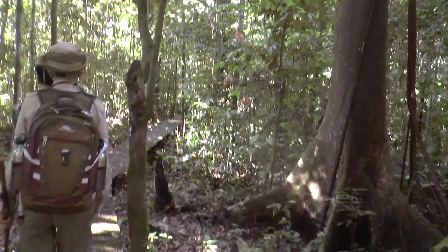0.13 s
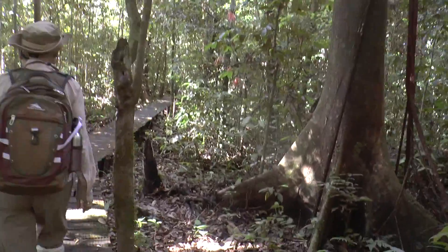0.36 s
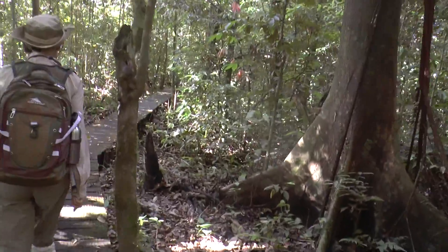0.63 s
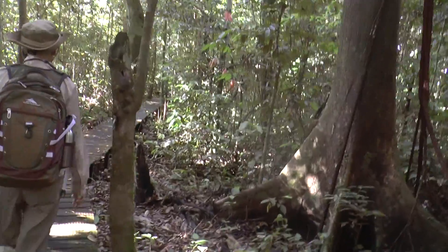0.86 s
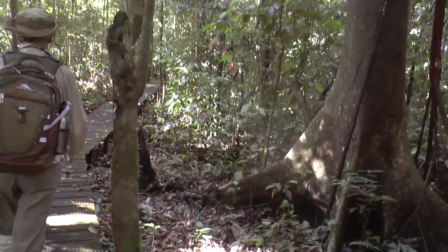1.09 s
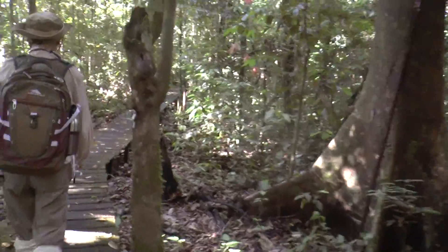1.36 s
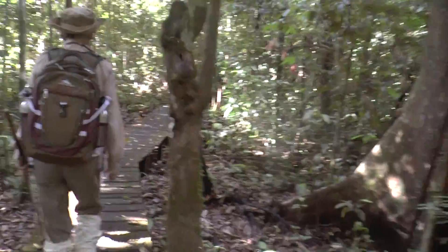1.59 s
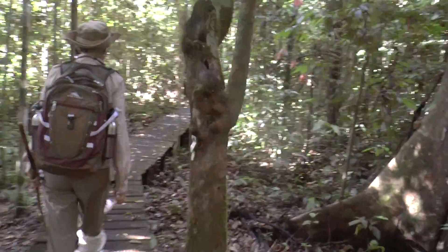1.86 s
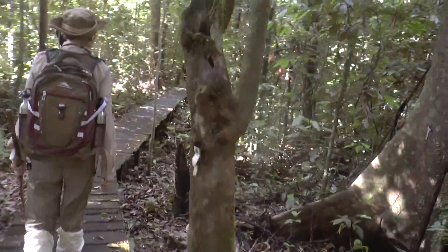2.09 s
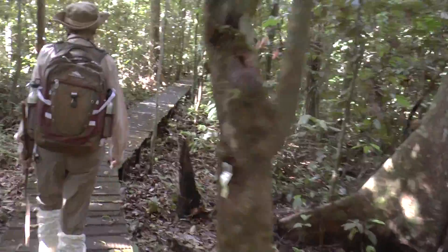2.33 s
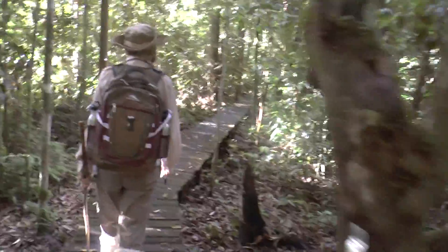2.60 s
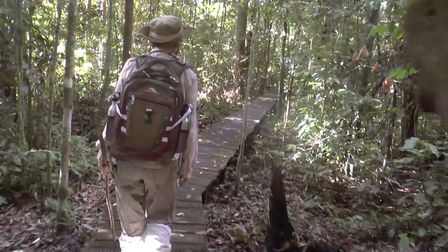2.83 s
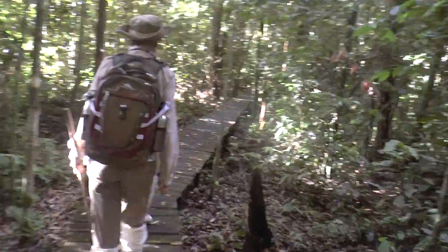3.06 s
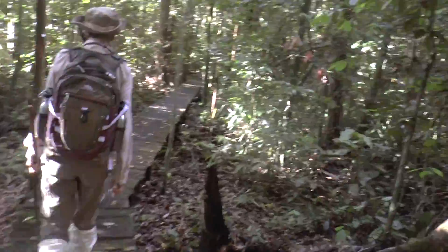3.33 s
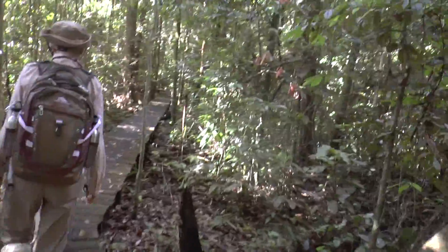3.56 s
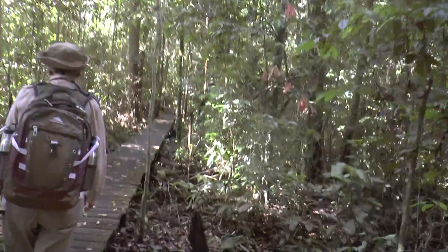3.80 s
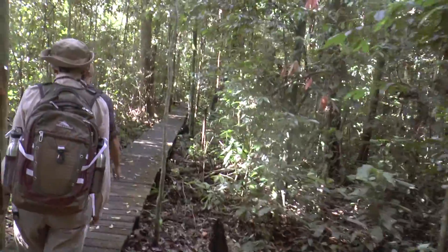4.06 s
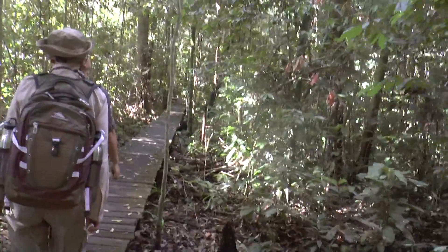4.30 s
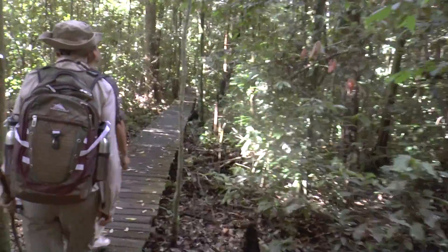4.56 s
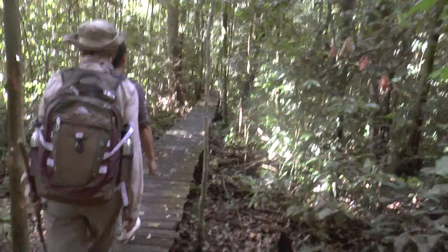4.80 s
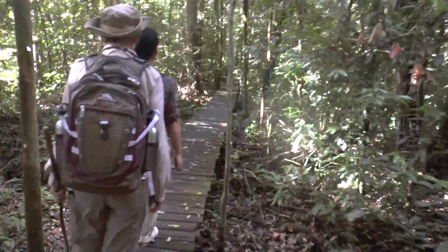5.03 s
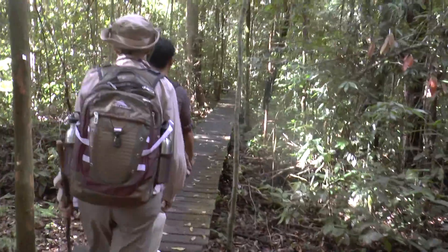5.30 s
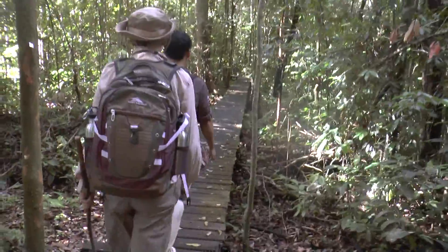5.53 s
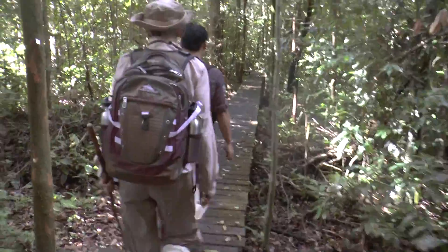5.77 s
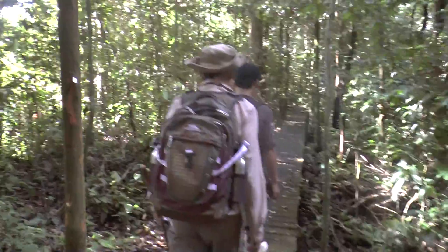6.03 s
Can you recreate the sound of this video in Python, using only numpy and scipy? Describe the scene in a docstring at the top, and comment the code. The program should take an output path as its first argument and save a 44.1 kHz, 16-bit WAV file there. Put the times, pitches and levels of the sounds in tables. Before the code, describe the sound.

Outdoors in dense rainforest, heard through two close microphones on a moving camera: high insect hiss, soft leaf rustle and a shrill pulsating cicada. Footsteps thud and knock on boards, some with sharp hard clicks, clothes swishing. A thin bird whistle precedes the cicada's first coarse rasp near two seconds; a clean buzz leads back into the throb. Small ticks and hollow board thumps follow, then a second rasp and restart.

```python
"""In a rain forest a far chorus hisses and leaves rustle as noise bands, while a near cicada throbs as ringing clicks.
Boots knock on a plank walkway by pushing noise through resonances; hard dry knocks ring and cloth swishes as noise.
The throb turns slower, a bird whistles a run of gliding tones, and the song breaks into a broad rasp of clicks.
A clean buzz leads into the next phrase; a small insect ticks, a loose board hums twice, then the rasp returns
and the song starts again. A hand-held camera hears it all through two close microphones."""
import sys
import numpy as np
from scipy import signal
from scipy.fft import rfft, irfft, next_fast_len
from scipy.io import wavfile
from scipy.ndimage import uniform_filter1d, map_coordinates

SR = 44100
rng = np.random.default_rng(int(sys.argv[2]) if len(sys.argv) > 2 else 0)


def volts_from_db(level):
    """Convert decibel levels to linear amplitude ratios."""
    exponent = np.asarray(level, float) / 20
    return 10 ** exponent


def persist_wave(psi):
    """Save psi, clipped to +-1, as 16-bit WAV."""
    counts = np.round(np.clip(psi, -1, 1) * 32767).astype(np.int16)
    wavfile.write(sys.argv[1], SR, np.atleast_2d(counts).T)


N = 271215


def unit(x):
    """Scaled to rms 1."""
    return x / np.sqrt(np.mean(x ** 2) + 1e-20)


def along(points, hz):
    """(f/Hz, value) points read on a log frequency axis."""
    f, v = np.transpose(points)
    return np.interp(np.log(hz + 1), np.log(f + 1), v)


def curves(rows, outside=None):
    """One value per sample for each column after the time."""
    s, *cols = np.transpose(rows)
    return [np.interp(np.arange(N) / SR, s, c, outside, outside) for c in cols]


def wobble(rate):
    """A smooth random curve, rate knots a second."""
    return map_coordinates(rng.standard_normal(N // 50), [np.arange(N) * rate / SR])


def filtered(x, response):
    """x times a complex response of frequency."""
    m = next_fast_len(N + 8192)
    return irfft(rfft(x, m) * response(np.fft.rfftfreq(m, 1 / SR)), m)[..., :N]


def coloured(x, spectrum):
    """x shaped by (f/Hz, level/dB) points, rms 1."""
    return unit(filtered(x, lambda hz: volts_from_db(along(spectrum, hz))))


def modes(table):
    """Causal response of resonances (f/Hz, width/Hz, level/dB), alternating in sign."""
    def response(f):
        total = 0
        for k, (centre, width, db) in enumerate(table):
            damping = 1j * f * width
            total = total + (-1) ** k * volts_from_db(db) * damping / (centre * centre - f * f + damping)
        return total
    return response


def patchy(depth_db):
    """Noise whose gain drifts in patches of time and frequency."""
    z = signal.stft(rng.standard_normal(N + 512), nperseg=512)[2]
    field = uniform_filter1d(rng.standard_normal(z.shape), size=6, axis=0)
    field = uniform_filter1d(field, size=12, axis=1)
    return signal.istft(z * volts_from_db(depth_db * unit(field)), nperseg=512)[1][:N]


def crackle(spread_db):
    """Noise of very unequal strength from moment to moment, as from grit or cloth."""
    return unit(rng.standard_normal(N) * volts_from_db(spread_db * wobble(700)))


# scatter among the trees around the camera: f/Hz, t60/s
TRUNK_DECAY = [(150, 0.98), (1000, 0.43), (4000, 0.36), (12000, 0.052)]


def echo(x, wet_db):
    """x plus its scatter off trunks and leaves, a decaying noise that changes as the camera moves on."""
    out, hop = np.pad(x, (0, SR)), SR // 4
    for start in range(0, N, hop):
        hz, t, z = signal.stft(rng.standard_normal(SR // 2), SR, nperseg=256)
        decay = volts_from_db(-60 * t / along(TRUNK_DECAY, hz)[:, None])
        tail = signal.istft(z * decay, SR, nperseg=256)[1]
        wet = signal.fftconvolve(x[start:start + hop], tail / np.linalg.norm(tail))
        out[start:start + len(wet)] += volts_from_db(wet_db) * wet
    return out[:N]


def aside(x, side_db):
    """Two close ports hear a near source alike in the bass, less so higher up."""
    hz, t, z = signal.stft(x, SR, nperseg=256)
    turn = np.exp(2j * np.pi * rng.random(z.shape)) * (hz / (hz + 600))[:, None]
    side = volts_from_db(side_db) * signal.istft(z * turn, SR, nperseg=256)[1][:N]
    return np.array([x + side, x - side])


# far insects and leaves grow and sink together: t/s, chorus level/dB
STIR = [(0, -38), (.9, -41.5), (2.5, -39), (3.3, -41.5), (3.8, -38.5), (5.1, -41), (6.15, -37.5)]
# colours of the far insects, the leaves and the walkway's low rumble: f/Hz, level/dB per Hz
CHORUS_COLOUR = [(900, -21.5), (1600, -15.5), (2700, -6.5), (3300, 3.5), (5100, -1), (6200, -3.5),
                 (7300, -1), (8600, -7.5), (10100, -16), (12200, -19), (16300, -42)]
RUSTLE_COLOUR = [(60, -24), (100, -3.5), (440, -1.5), (760, -3), (1500, -11), (2600, -8.5), (3400, -49)]
RUMBLE_COLOUR = [(15, -30), (55, -23), (72, 17), (100, -2), (140, -34)]
# the rumble swells: t/s, level/dB
RUMBLE_SWELLS = [(3.8, -65), (4.8, -71)]
# the forest's difference between the two ports: f/Hz, level/dB per Hz
AROUND_COLOUR = [(20, -27), (350, -9.5), (2760, -20), (3700, -2.5), (5300, -11), (6600, -26), (8600, -13.5),
                 (10000, -45)]


def forest():
    """Far insects merge into hiss; leaves rustle, the walkway rumbles, and the ports differ a little."""
    rustle_offset_db, rustle_swing = -11, 0.94  # against the chorus mean and its rise and fall
    rumble_db, swell_s = -71, 0.35  # walkway at rest; width of a swell
    chorus_db, = curves(STIR)
    mean_db = chorus_db.mean()
    rustle_db = mean_db + rustle_offset_db + rustle_swing * (chorus_db - mean_db)
    t = np.arange(N) / SR
    sway = volts_from_db(rumble_db) + sum(volts_from_db(db) * np.exp(-((t - s) / swell_s) ** 2) for s, db in RUMBLE_SWELLS)
    chorus = volts_from_db(chorus_db + 0.67 * wobble(12)) * coloured(patchy(depth_db=1.4), CHORUS_COLOUR)
    rustle = volts_from_db(rustle_db + 0.35 * wobble(12)) * coloured(patchy(depth_db=1.6), RUSTLE_COLOUR)
    rumble = sway * coloured(rng.standard_normal(N), RUMBLE_COLOUR)
    around = volts_from_db(-49.5 + 0.29 * wobble(2.94)) * coloured(patchy(depth_db=2.0), AROUND_COLOUR)
    return chorus + rustle + rumble + np.array([around, -around])


# far whistled notes: start t/s, length/s, pitch f/Hz, rms level/dB at the note's end
NOTES = [(1.634, 0.089, 1870, -60), (1.79, 0.11, 1870, -55), (2.044, 0.13, 1987, -53),
         (2.233, 0.044, 1963, -46), (2.292, 0.066, 1998, -43), (2.381, 0.036, 1978, -41),
         (2.443, 0.055, 1965, -37.5)]


def bird():
    """A thin, far whistle in short notes, a sine gliding from pitch to pitch."""
    swell_db, release_s = 8, 0.025  # each note grows to its end, then stops
    t = np.arange(N) / SR
    s, length, hz, db = np.transpose(NOTES)
    u = (t - s[:, None]) / length[:, None]
    after = np.clip((u - 1) * length[:, None] / release_s, 0, 1)
    note_db = db[:, None] - swell_db * np.clip(1 - u, 0, 1)
    gain = np.sum((u > 0) * volts_from_db(note_db) * (1 - after), axis=0)
    onset_hz = (hz + np.append(hz[0], hz[:-1])) / 2  # halfway from the note before
    knots = np.ravel([s, s + length], 'F')
    pitch = np.interp(t, knots, np.ravel([onset_hz, hz], 'F')) + 5 * wobble(40.1)
    return np.sqrt(2) * uniform_filter1d(gain, size=500) * np.sin(2 * np.pi * np.cumsum(pitch) / SR)


# colour of a small, faint insect: f/Hz, level/dB per Hz
TICK_COLOUR = [(1500, -23), (1900, 3), (2950, 14), (3400, -29)]


def ticker():
    """Short, even ticks of decaying noise, slightly unequal in strength."""
    from_s, to_s, tick_hz, onset_db, t60_s = 3.447, 4.5, 20.8, -41, 0.055
    t = np.arange(N) / SR
    since = (t - from_s) % (1 / tick_hz)
    on = (t > from_s) & (t < to_s)
    gain = on * volts_from_db(onset_db + 2.5 * wobble(10) - 60 * since / t60_s)
    return gain * coloured(rng.standard_normal(N), TICK_COLOUR)


# the walkers' clothes brushing, before the mix: t/s, length/s, level/dB
SWISHES = [(0.665, 0.14, -40.5), (1.87, 0.096, -40.5), (1.91, 0.37, -39.5), (3.137, 0.035, -42),
           (4.158, 0.07, -33.5), (5.31, 0.37, -37.5)]
# colour of the cloth: f/Hz, level/dB per Hz
CLOTH_COLOUR = [(2000, -11), (5000, 4), (9000, -8), (13000, -17.5), (16400, -36)]


def clothes():
    """Cloth brushes cloth: a quick rise and a slower fade of uneven noise."""
    t = np.arange(N) / SR
    stroke = np.zeros(N)
    for s, length, db in SWISHES:
        u = np.clip((t - s) / length, 0, None)
        stroke += volts_from_db(db) * 4 * u * np.exp(1 - 4 * u)
    return stroke * coloured(crackle(spread_db=2.5), CLOTH_COLOUR)


# boot contacts on the boards, before the mix: t/s, knock level/dB, roll-on/s, plank t60/s,
# lightness level/dB (more grit, less thud)
STEPS = [(.17, -48.5, 0.033, 0.21, 1), (0.668, -42.5, .0092, 0.31, 1), (0.787, -45.5, 0.0044, 0.091, 4.5),
         (1.286, -41, 0.0083, 0.31, 2.5), (1.855, -35, 0.014, 0.27, 3), (2.566, -47, 0.015, 0.042, 1),
         (3.036, -39.5, 0.002, 0.4, 2), (3.587, -51.5, 0.039, 0.24, -0.5), (3.974, -47, 0.013, 0.23, 1),
         (4.137, -35.5, 0.037, 0.24, -0.5), (4.678, -36.5, 0.037, 0.17, -1.5),
         (5.262, -38.5, 0.011, 0.063, 1)]
# resonances of the plank, the beam below and the boot sole: f/Hz, width/Hz, level/dB
PLANK = [(407, 79, -3), (773, 120, -1.5), (1072, 154, 0.5), (1383, 150, -1)]
BEAM = [(104.4, 30, -4), (153, 120, -0.5), (275, 380, -3)]
SOLE = [(1840, 180, 1.5), (2120, 390, -0.5), (3170, 1300, -3.5)]


def steps():
    """The heel touches, the boot rolls on, rings plank and beam and grinds grit under its sole."""
    thud_db, grit_db = -2, 1  # relative to the knock
    force, t = np.zeros((3, N + SR)), np.arange(SR // 2) / SR  # rows: plank, beam, sole
    heel = np.array([[.45], [.1], [.55]])  # share of the force at first touch: the weight comes later
    lasting = np.array([[1.0], [1.25], [.6]])  # the beam rings longest, grit dies first
    for s, knock_db, roll, t60, light_db in STEPS:
        rise = np.clip(t / max(roll, .001), 0, 1)
        fade = volts_from_db(-60 * np.clip(t - roll, 0, None) / (max(t60, .01) * lasting))
        shape = (heel + (1 - heel) * rise) * fade
        balance = volts_from_db([[0], [thud_db - light_db], [grit_db + light_db]])
        force[:, round(s * SR):][:, :len(t)] += volts_from_db(knock_db) * balance * shape
    contact = crackle(spread_db=4.0)
    out = np.zeros(N)
    for push, body in zip(force[:, :N], (PLANK, BEAM, SOLE)):
        steep = lambda f: modes(body)(f) / (1 + 1j * f / (2 * body[-1][0]))  # rubber softens the top
        out += filtered(push * contact, steep) / np.std(filtered(contact, steep))
    return out


# a boot lands unevenly and raps the plank in quick clusters, before the mix:
# t/s, peak level/dB, contact pitch f/Hz
RAPS = [(0.682, -21, 2880), (0.717, -26.5, 2200), (1.308, -32, 950), (1.884, -22, 2100),
        (4.168, -26.5, 600), (4.181, -25, 1350), (4.298, -35.5, 684), (4.679, -34, 1300),
        (4.686, -31, 1280), (4.693, -27, 1330), (4.701, -34, 350), (4.712, -32, 298), (4.862, -36, 1280),
        (5.265, -29, 2000), (5.273, -35, 2200)]


def raps():
    """Each short contact favours the walkway's resonances near its own pitch."""
    out, t = np.zeros(N + SR), np.arange(2048) / SR
    ring = filtered(np.arange(N) == 0, modes(BEAM + PLANK + SOLE))[:len(t)]
    for s, db, hz in RAPS:
        contact = t * np.exp(-1.6 * hz * t) * np.sin(2 * np.pi * hz * t)
        rap = signal.fftconvolve(contact, ring)
        out[round(s * SR):][:len(rap)] += volts_from_db(db) * rap / np.abs(rap).max()
    return out[:N]


# a loose board hums briefly, before the mix: t/s, f/Hz, peak level/dB, length/s
THUMPS = [(3.683, 146, -39, .05), (3.975, 150, -44, .04)]


def loose_board():
    """Hollow thumps: low sines under half-sine swells."""
    s, hz, db, length = np.transpose(THUMPS)[..., None]
    u = np.clip((np.arange(N) / SR - s) / length, 0, 1)
    return np.sum(volts_from_db(db) * np.sin(np.pi * u) * np.sin(2 * np.pi * hz * length * u), axis=0)


# hard dry knocks on the boards, heel clicks with the louder steps and perhaps a stick, before the mix:
# t/s, peak level/dB
HARD_KNOCKS = [(0.669, -21), (1.538, -29), (1.669, -34), (1.866, -18.5), (3.041, -19.5), (3.35, -33.5),
               (3.867, -28.5), (5.351, -16)]
# resonances of the hard knock: f/Hz, width/Hz, level/dB
KNOCK_MODES = [(884, 180, 3.5), (1750, 150, -1.5), (2280, 170, -1), (3060, 210, 1)]


def hard_knocks():
    """Dry knocks: single blows ring a few resonances."""
    blows = np.zeros(N)
    for s, db in HARD_KNOCKS:
        blows[round(s * SR)] = volts_from_db(db)
    single = filtered(np.arange(N) == 0, modes(KNOCK_MODES))
    return filtered(blows, modes(KNOCK_MODES)) / np.abs(single).max()


CLICK_HZ = 264  # tymbal buckles a second in the song
RASP_S = .36  # from rasp to next phrase


def buckles(click_hz, clean, sharp, smear):
    """Each buckle of the ribbed membrane is a click with a short burst of noise; distance smears them."""
    turns = np.cumsum(click_hz * (1 + .015 * wobble(6) + .03 * wobble(120))) / SR
    clicks = np.diff(np.floor(turns), prepend=0)
    gate = np.exp(-sharp * (turns % 1))
    return clean * unit(clicks) + unit(rng.standard_normal(N) * gate) + smear * rng.standard_normal(N)


# phrases of the near song: throb slows t/s, rasp starts t/s, starting level/dB, slow throb depth level/dB,
# level/dB of the clean buzz after the rasp
PHRASES = [(1.117, 2.0, -32.5, 3, -26.5), (4.596, 5.437, -31.5, 7, -30), (8.042, 8.88, -30.5, 4, -30)]


def effort():
    """Gain of the song: each phrase sets in, tires, slows its throb and swells, then fades into the rasp."""
    fast_hz, slow_hz, fast_depth_db = 20.9, 16.2, 2.63  # throbs a second; depth of the fast throb
    turn_at_slowing, square = 0.4, 2.8  # throb phase in turns; each throb is a burst with steep sides
    sag_db_per_s, swell_db_per_s = 1.47, 4  # tiring from the start; growth added once slow
    rise_s, fade_s = 0.063, 0.065  # opening rise, fade into the rasp
    settle_s, deepen_s, blur_s = 0.067, 0.23, 0.35  # throb sets in, changes depth, blurs towards the rasp
    t, gain = np.arange(N) / SR, volts_from_db(-38)  # other singers under the rasp
    begin = -1.1  # the first phrase is under way
    for slows, rasps, level_db, depth_db, _ in PHRASES:
        age, late = np.clip(t - begin, 0, None), np.clip(t - slows, 0, None)
        opening = np.clip(age / rise_s, 0, 1) * np.clip((rasps - t) / fade_s, 0, 1)
        turns = turn_at_slowing + np.where(t < slows, fast_hz, slow_hz) * (t - slows)
        depth = np.interp(t, [begin, begin + settle_s, slows - deepen_s, slows, rasps - blur_s, rasps - fade_s],
                          [0, fast_depth_db, fast_depth_db, depth_db, depth_db, 0])
        throb = np.tanh(square * np.cos(2 * np.pi * turns))
        db = level_db - sag_db_per_s * age + swell_db_per_s * late + depth * throb
        gain = np.hypot(gain, opening * volts_from_db(np.minimum(db, 0)))
        begin = rasps + RASP_S
    return gain


def buzz():
    """As the abdomen tightens again the buckles come so evenly that they sound as clean overtones."""
    buckle_hz, length_s, lead_s = 256.6, 0.07, 0.027  # lead: start before the next phrase
    t = np.arange(N) / SR
    turns = np.cumsum(buckle_hz * (1 + .002 * wobble(8))) / SR
    tones = np.zeros(N)
    for k in range(10, 22):
        phase = 2 * np.pi * k * turns + .9 * wobble(10)
        tones += volts_from_db(along(TYMBAL_COLOUR, k * buckle_hz)) * np.cos(phase)
    gain = np.zeros(N)
    for _, rasps, _, _, buzz_db in PHRASES:
        start = rasps + RASP_S - lead_s
        gain += volts_from_db(buzz_db) * np.sin(np.pi * np.clip((t - start) / length_s, 0, 1))
    return unit(tones) * gain


# rasp between phrases: t/s after its start, level/dB before the edge and resonances, lower edge f/Hz
RASP = [(-.03, -64, 2700), (.005, -33, 2800), (.19, -34.5, 1950), (.33, -35.5, 1960), (.36, -41, 2900),
        (.41, -46.5, 2890)]
# resonances of the slack abdomen sink during the rasp: start f/Hz, end f/Hz, half width/Hz, gain
SINKING = [(7200, 6300, 260, 0.99), (5500, 4500, 430, 1)]
# colour of the slack abdomen: f/Hz, level/dB per Hz
SLACK_COLOUR = [(1500, -10.5), (3000, 1.5), (3700, -5.5), (4300, 4.5), (5000, -3.5), (7100, -4),
                (8500, -4.5), (9000, -24.5), (10000, -60)]


def rasp(start):
    """Slack abdomen: clicks ring broadly; the lower edge slides down, then rises again as the rasp fades."""
    rows = np.add(RASP, [start, 0, 0])
    clicks = coloured(buckles(1.04 * CLICK_HZ, clean=1.2, sharp=1.2, smear=.6), SLACK_COLOUR)
    hz, t, z = signal.stft(clicks, SR, nperseg=256)
    f = hz[:, None]
    edge_hz = np.interp(t, rows[:, 0], rows[:, 2])
    highpass = 1 / (1 + (edge_hz / (f + 1)) ** 14)
    edge_peak = 1.04 / (1 + ((f / edge_hz - 1.05) / 0.1) ** 2)  # a resonance rides the edge
    slack = np.clip((t - start) / RASP_S, 0, 1)
    sinking = sum(g / (1 + ((f - a - (b - a) * slack) / w) ** 2) for a, b, w, g in SINKING)
    colour = (highpass + edge_peak) * (0.69 + sinking)
    return volts_from_db(curves(rows, outside=-120)[0]) * signal.istft(z * colour, SR, nperseg=256)[1][:N]


# colour of the near cicada's tight abdomen: f/Hz, level/dB per Hz
TYMBAL_COLOUR = [(2800, -50), (3300, -16.5), (3650, 0.5), (3950, 2), (4200, -2), (4520, 3), (4850, -6),
                 (5150, -23.5), (5600, -45)]


def cicada():
    """A tight abdomen rings near 4 kHz, its resonances never quite still, and throbs between the rasps."""
    drift = 0.0055  # the ring wanders by this share of its pitch
    tense_hz, tense_half_width_hz, tense_gain = 4020, 26, 1.1  # a narrow mode grows as the song swells
    seesaw_db, sweep = 3.0, 3.5  # upper and lower ring trade strength; ms per kHz near the ring
    hz, t, z = signal.stft(buckles(CLICK_HZ, clean=1.3, sharp=.4, smear=.6), SR, nperseg=1024)
    f = hz[:, None]
    frames = np.minimum(t * SR, N - 1).astype(int)
    swell = 0
    for slows, rasps, *_ in PHRASES:
        swell = swell + np.clip((t - slows) / (rasps - slows), 0, 1) * (t < rasps)
    tense = 1 + tense_gain * swell / (1 + ((f - tense_hz) / tense_half_width_hz) ** 2)
    colour = volts_from_db(along(TYMBAL_COLOUR, f * (1 + drift * wobble(2.89)[frames]))) * tense
    above = np.tanh((f - tense_hz) / 1000)  # kHz near the ring, bounded far from it
    seesaw = volts_from_db(seesaw_db * above * wobble(9)[frames])
    click_sweep = np.exp(-1j * np.pi * sweep * above ** 2)  # ribs buckle in turn
    ring = unit(signal.istft(z * colour * seesaw * click_sweep, SR, nperseg=1024)[1][:N])
    rasps = sum(rasp(row[1]) for row in PHRASES if row[1] < N / SR)
    return echo(effort() * ring + buzz() + rasps, wet_db=-7)


def scene():
    """Forest and singers lie around the two ports; the walkers are slightly louder in the first port."""
    boards = steps() + hard_knocks() + raps() + loose_board()
    walkers = aside(echo(boards, wet_db=-10.0), side_db=-10.0) + clothes()
    singers = aside(cicada() + bird() + ticker(), side_db=-14.5)
    return forest() + singers + walkers * volts_from_db([[.7], [-.7]])  # dB in each port


def low_pass(x):
    """Removes everything above the highest recorded frequency."""
    return signal.sosfilt(signal.butter(12, 16420, fs=SR, output="sos"), x)


def record(dry):
    """The finished mix holds only what lies below 16420 Hz."""
    mix = filtered(dry, lambda hz: hz < 16420)
    return low_pass(mix)


dry = scene()
out = record(dry)
persist_wave(out)
```